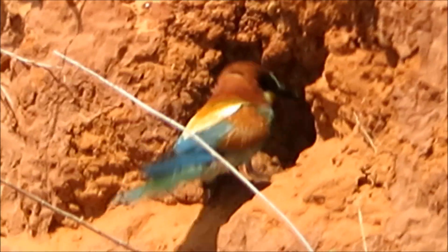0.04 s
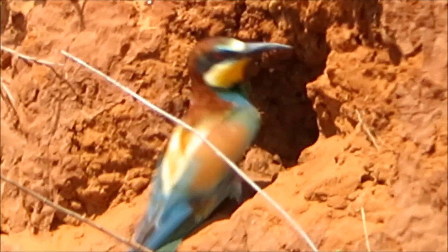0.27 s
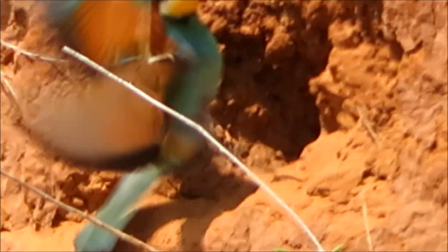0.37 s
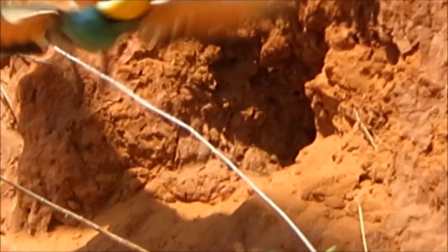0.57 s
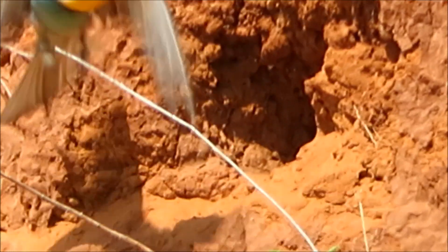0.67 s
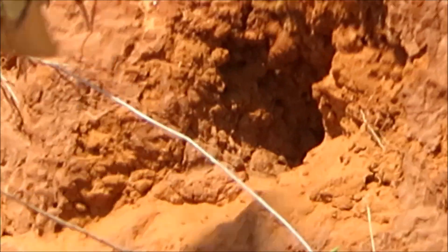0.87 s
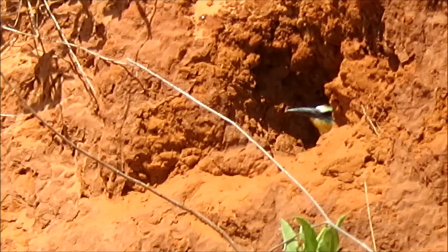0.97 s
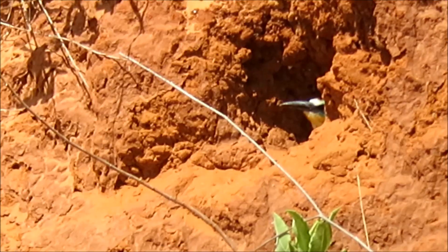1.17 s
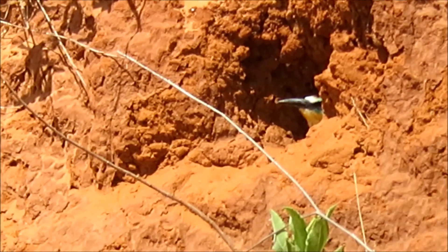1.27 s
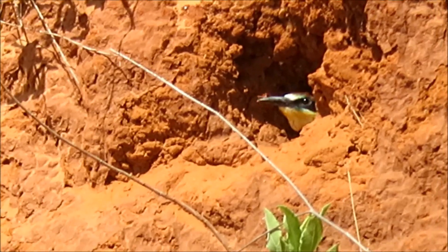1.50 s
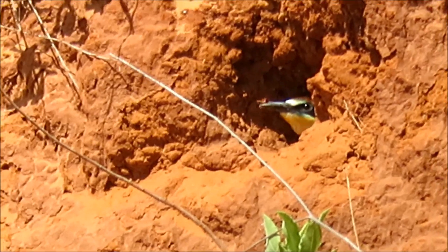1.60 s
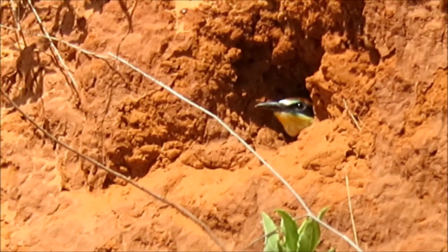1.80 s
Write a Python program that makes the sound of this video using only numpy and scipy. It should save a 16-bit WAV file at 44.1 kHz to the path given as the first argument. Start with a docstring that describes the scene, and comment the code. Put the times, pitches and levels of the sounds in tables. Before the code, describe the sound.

Wind rumbles and thumps against the microphone outdoors, strongest in the middle. A bee-eater at an earth bank gives one short rolling whistle, then three quick ones near the end, while small birds chirp very faintly far off.

```python
"""Bee-eater at a windy earth bank

Out in the open, facing the bank, gusts throw eddies against the camera microphone over a soft hush.
A bee-eater gives four whistles, rolled by quick upward flips of pitch, and the bank echoes them.
Small birds chirp and churr faintly far off, the chirps to the right. A dry rustle and one tick
come before the first whistle."""
import sys
import numpy as np
from scipy import signal
from scipy.fft import rfft, irfft
from scipy.io import wavfile
from scipy.ndimage import uniform_filter1d

SR = 44100
rng = np.random.default_rng(int(sys.argv[2]) if len(sys.argv) > 2 else 0)


def materialize(psi):
    """Save the field psi as 16-bit PCM at rate SR to the path in sys.argv[1].

    A 1-D psi becomes a single channel; in a 2-D psi each row is a channel.
    """
    bounded = np.clip(np.atleast_2d(psi).T, -1, 1)
    quanta = np.round(bounded * 32767).astype(np.int16)
    wavfile.write(sys.argv[1], SR, quanta)


N = 81585

# wind strength at the microphone: (time [s], relative level [dB])
GUSTS = [(0, -38), (.12, -39), (.195, -40), (.23, -33), (.3, -40.5), (.35, -37), (.38, -41.5), (.41, -32.5),
         (.46, -37.5), (.61, -36.5), (.66, -32), (.745, -22), (.78, -25), (.82, -27.5), (.85, -34),
         (.9, -25), (.95, -24), (1.0, -28.5), (1.04, -22.5), (1.075, -20.5), (1.1, -29), (1.14, -24.5),
         (1.152, -35), (1.21, -32.5), (1.25, -29), (1.29, -34), (1.34, -27.5), (1.37, -37.5),
         (1.392, -32.5), (1.405, -51), (1.46, -39), (1.53, -37.5), (1.57, -39.5), (1.62, -37.5),
         (1.72, -46.5), (1.78, -54), (1.85, -43)]
# hardest eddies: (time [s], relative peak [dB], pitch [Hz], bright snap against that peak [dB])
BUFFETS = [(0.016, -30.5, 276, -20), (0.063, -26.5, 333, -32), (0.23, -19.5, 243, -22),
           (0.408, -22, 213, -19.5), (0.431, -24.5, 208, -16), (0.518, -20, 223, -31),
           (0.629, -17.5, 348, -29), (0.735, -18, 197, -22), (0.749, -7, 263, -27.5),
           (0.805, -18.5, 249, -18.5), (0.819, -19, 254, -25.5), (0.876, -16.5, 304, -33),
           (0.911, -22.5, 340, -10), (0.934, -15.5, 465, -26.5), (0.962, -19, 324, -12.5),
           (1.059, -9.5, 446, -23.5), (1.067, -14.5, 227, -23), (1.077, -13.5, 290, -14),
           (1.127, -8.5, 174, -43), (1.143, -16, 271, -28), (1.188, -16.5, 233, -20.5),
           (1.235, -12, 166, -28), (1.268, -15.5, 238, -41), (1.305, -14, 210, -30), (1.379, -17, 193, -38),
           (1.392, -17.5, 203, -44), (1.509, -22, 282, -44)]
# colour of calm wind, strong wind and the roar atop a gust: (frequency [Hz], relative level [dB])
CALM_COLOUR = [(20, -21), (40, -2.5), (85, 0), (190, 7.5), (400, -2.5), (480, -7.5), (580, -15), (900, -54),
               (1600, -65.5), (6000, -110)]
STRONG_COLOUR = [(20, -27.5), (70, -3), (133, 0.5), (330, 4), (450, 0), (580, -9), (770, -19.5), (950, -34),
                 (1600, -44.5), (3500, -53), (12000, -100)]
ROAR_COLOUR = [(400, -27.5), (700, 6.5), (1200, -6), (2200, -52.5), (6000, -89.5)]
# wind that differs between the microphone's two ports: (frequency [Hz], side against mid [dB])
WIND_SIDE = [(25, -58.5), (60, -47.5), (125, -65), (250, -38), (450, -21), (800, -19), (1500, 6), (3000, 3)]
# colour of the open-air hush: (frequency [Hz], level per third octave before the swell [dB])
HUSH_COLOUR = [(25, -73), (50, -66), (100, -61.5), (300, -55), (600, -65.5), (1000, -61), (1400, -63),
               (1700, -65.5), (2100, -69), (2800, -72), (3700, -71), (5000, -75.5), (6300, -78),
               (8000, -81.5), (10000, -84), (12500, -89), (14000, -90.5), (15500, -110)]
# side level of the hush in the stereo mix, near mono below 2 kHz:
# (frequency [Hz], side against mid [dB])
HUSH_SIDE = [(500, -74.5), (1200, -63), (2000, -17), (3000, -8), (6000, -0.5), (12000, 4)]
# swell of the hush: (time [s], gain [dB])
HUSH_SWELL = [(0, -0.5), (.2, 0), (.4, 3), (.8, 2.4), (1.3, 3.5), (1.6, 2.5), (1.7, 5.5), (1.85, 2.5)]
# far chirps: (centre time [s], half length [s], pitch [Hz], glide per half [Hz], relative level [dB],
# left against right [dB])
CHIRPS = [(.065, .014, 5410, -40, -64, -9), (.14, .014, 4450, 0, -68, -4), (.169, .013, 6140, 15, -62, -7),
          (.406, .017, 5420, -80, -61, -5), (.493, .009, 4400, 0, -67, -3), (.516, .013, 6040, 40, -60, -4),
          (1.711, .016, 5930, 40, -69, -8)]
# course of the rustle: (time [s], level [dB])
RUSTLE_LEVEL = [(.17, -85), (.23, -58.5), (.33, -63.5), (.44, -56), (.49, -63), (.56, -56), (.65, -66),
                (.75, -63), (.85, -87)]
# its colour: (frequency [Hz], relative level [dB])
RUSTLE_COLOUR = [(500, -32.5), (900, -13.5), (1300, 2.5), (1600, -8), (2600, -8), (3500, -33),
                 (6000, -24.5), (12000, -67)]
# far churrs: (start [s], length [s], first pitch [Hz], last pitch [Hz], level [dB])
CHURRS = [(0.2, 0.088, 3800, 3570, -65), (.355, 0.037, 5500, 5470, -67), (0.763, 0.078, 3810, 3730, -67),
          (1.643, 0.14, 3906, 3446, -62.5), (1.8, .06, 3700, 4000, -68.5)]
# bee-eater, one list per whistle: (time [s], pitch before flips [Hz], relative level [dB])
WHISTLES = [
    [(.8, 1470, -66), (.82, 1589, -52), (.834, 1746, -49), (.846, 1757, -45), (.865, 1813, -45.5),
     (.887, 1783, -40.5), (.903, 1846, -48), (.915, 1703, -48), (.925, 1830, -41), (.936, 1755, -40.5),
     (.944, 1840, -64.5)],
    [(1.532, 1500, -47), (1.538, 1600, -50), (1.543, 1787, -52), (1.552, 1813, -39), (1.571, 1890, -36.5),
     (1.58, 1973, -39), (1.587, 1957, -37), (1.594, 1880, -75.5), (1.605, 1956, -46), (1.617, 2160, -52)],
    [(1.62, 1426, -45), (1.626, 1610, -48.5), (1.633, 1826, -48), (1.644, 1764, -38.5), (1.654, 1964, -36),
     (1.658, 1897, -43.5), (1.664, 1860, -38), (1.672, 1930, -53), (1.686, 1940, -45), (1.694, 1930, -62)],
    [(1.783, 1960, -63), (1.794, 1965, -49), (1.812, 2100, -40), (1.822, 2074, -47), (1.832, 1987, -39.5),
     (1.839, 2010, -54.5), (1.86, 2060, -29)],
]
# upward pitch flips that give the roll: (time [s], height [Hz])
FLIPS = [(0.852, 517), (0.876, 399), (0.894, 285), (0.926, 316), (1.585, 173), (1.822, 420), (1.85, 506)]
# reflections off the bank: (delay [s], left gain [dB], right gain [dB])
BANK_ECHOES = [(.006, -17, -19), (.013, -19, -16), (.026, -19, -20)]


def gain_of(db):
    """Decibels to gain."""
    return 10 ** (np.asarray(db) / 20)


def unit_rms(x):
    """Scales to rms 1."""
    return x / np.sqrt(np.mean(x ** 2) + 1e-20)


def curve(points, col=1):
    """A table column along the whole time axis."""
    rows = np.array(points)
    return np.interp(np.arange(N) / SR, rows[:, 0], rows[:, col])


def coloured(x, *spectra):
    """Filters x by the sum of dB spectra."""
    log_hz = np.log(np.fft.rfftfreq(N, 1 / SR) + 1)
    db = sum(np.interp(log_hz, np.log(rows[:, 0]), rows[:, 1]) for rows in map(np.array, spectra))
    return irfft(rfft(x) * gain_of(db), N)


def flutter(samples):
    """Noise smoothed over so many samples, at rms 1."""
    return unit_rms(uniform_filter1d(rng.standard_normal(N), samples))


def stereo(mid, side):
    """Mid and side to left and right."""
    return np.array([mid + side, mid - side])


def wind(eddies_per_s=800, clump_s=.008, calm_db=-39, strong_db=-23.5):
    """Random eddies strike the microphone in clumps, brighter as the wind rises."""
    gust_db = curve(GUSTS)
    span = round(clump_s * SR)
    clump_db = 1.5 * unit_rms(uniform_filter1d(flutter(span), span))
    size = gain_of(1.5 * np.minimum(rng.exponential(1, (2, N)), 3))
    eddies = size * rng.choice([-1., 1.], (2, N)) * (rng.random((2, N)) < eddies_per_s / SR)
    strength = np.clip((gust_db - calm_db) / (strong_db - calm_db), 0, 1)
    mid, side = 0, 0
    for share, colour in ((1 - strength, CALM_COLOUR), (strength, STRONG_COLOUR)):
        rumble = coloured(eddies[0], colour)
        weight = np.sqrt(share) / np.std(rumble)
        mid += weight * rumble
        side += weight * coloured(eddies[1], colour, WIND_SIDE)
    roar = gain_of(-24 + 1.2 * (gust_db - strong_db))  # flares only in the strongest wind
    mid += roar * unit_rms(coloured(eddies[0], ROAR_COLOUR))
    side += roar * gain_of(-4) * unit_rms(coloured(eddies[1], ROAR_COLOUR))
    return gain_of(gust_db + clump_db - 1) * stereo(mid, side)


def hush():
    """Smooth far hush."""
    third_octave_to_density = [(hz, -10 * np.log10(.2316 * hz / (SR / 2))) for hz in (1, SR)]
    mid = coloured(rng.standard_normal(N), HUSH_COLOUR, third_octave_to_density)
    side = coloured(rng.standard_normal(N), HUSH_COLOUR, HUSH_SIDE, third_octave_to_density)
    return gain_of(curve(HUSH_SWELL)) * stereo(mid, side)


def buffets(thump_sigma_s=.002, snap_sigma_s=.0012, snap_hz=848):
    """Single hard eddies hit both microphone ports, each a low thump with a bright snap."""
    t, hits = np.arange(N) / SR, np.zeros((2, N))
    for at, db, hz, snap_db in BUFFETS:
        phases = rng.uniform(0, 2 * np.pi, (2, 1))  # mid, side
        thump = gain_of(db - 1.47) * np.exp(-((t - at) / thump_sigma_s) ** 2 / 2)
        snap = gain_of(db + snap_db) * np.exp(-((t - at) / snap_sigma_s) ** 2 / 2)
        hits += thump * np.cos(2 * np.pi * hz * (t - at) + phases)
        hits += snap * np.cos(2 * np.pi * snap_hz * t + phases[0])
    return stereo(hits[0], coloured(hits[1], WIND_SIDE))


def chirps(waver_hz=45):
    """Small birds far to the right give short, thin, wavering tones."""
    t, out = np.arange(N) / SR, np.zeros((2, N))
    waver = waver_hz * flutter(130)
    for centre, half_length, hz, glide_hz, db, pan_db in CHIRPS:
        position = np.clip((t - centre) / half_length, -1, 1)
        phase = 2 * np.pi * np.cumsum(hz + glide_hz * position + waver) / SR
        tone = np.sin([phase, phase + rng.uniform(1, 2.3)])  # out of step between the channels
        pan = gain_of([[pan_db / 2], [-pan_db / 2]])
        out += gain_of(db + 6.5) * pan * np.cos(np.pi / 2 * position) ** 2 * tone
    return out


def rustle(grains_per_s=4000, side_db=-21.5):
    """Dense dry grains near the centre, perhaps feathers as a bird turns and takes off."""
    size = gain_of(1.5 * rng.exponential(1, (2, N))) * rng.standard_normal((2, N))
    grains = size * (rng.random((2, N)) < grains_per_s / SR)
    mid, side = (unit_rms(coloured(row, RUSTLE_COLOUR)) for row in grains)
    return gain_of(curve(RUSTLE_LEVEL)) * stereo(mid, gain_of(side_db) * side)


def churrs(width_hz=260, pulses_per_s=110, side_db=-11):
    """Small birds further off churr: a narrow band of noise that glides and pulses."""
    t, out = np.arange(N) / SR, np.zeros((2, N))
    lowpass = signal.butter(2, width_hz / 2, fs=SR)
    pulsing = 1 + .15 * np.sin(2 * np.pi * pulses_per_s * t)
    for start, length, first_hz, last_hz, db in CHURRS:
        pitch = np.interp(t, [start, start + length], [first_hz, last_hz])
        phase = 2 * np.pi * np.cumsum(pitch) / SR
        slow_noise = signal.lfilter(*lowpass, rng.standard_normal((2, 2, N)))
        mid, side = unit_rms(slow_noise[0] * np.cos(phase) + slow_noise[1] * np.sin(phase))
        progress = np.clip((t - start) / length, 0, 1)
        arch = np.sqrt(np.sin(np.pi * progress).clip(0))
        out += gain_of(db) * arch * pulsing * stereo(mid, gain_of(side_db) * side)
    return out


def tick(at_s=.7357, decay_s=.00008, side_db=-4):
    """One small sharp pulse to the left of the microphone."""
    age = np.clip(np.arange(N) / SR - at_s, 0, .01) / decay_s
    pulse = gain_of(-29) * age ** 2 * (1 - age / 3) * np.exp(-age)
    return stereo(pulse, gain_of(side_db) * pulse)


def bee_eater(rise_s=.00209, fall_s=.0045, ramp_s=.003, flip_db_per_khz=3.5, overtone_db=-37):
    """Slightly rough, near-sine whistles slide up and roll, louder at each flip of pitch."""
    t, voice = np.arange(N) / SR, np.zeros(N)
    flip_hz = sum(hz * np.exp(-((t - at) / np.where(t < at, rise_s, fall_s)) ** 2 / 2)
                  for at, hz in FLIPS)
    for whistle in WHISTLES:
        start, end = whistle[0][0], whistle[-1][0] + ramp_s
        gate = np.clip(np.minimum(t - start, end - t) / ramp_s, 0, 1)
        phase = 2 * np.pi * np.cumsum(curve(whistle) + flip_hz) / SR
        level = gain_of(curve(whistle, col=2) + 3 + flip_db_per_khz * flip_hz / 1000)
        voice += gate * level * (np.sin(phase) + gain_of(overtone_db) * np.sin(2 * phase))
    return voice * (1 + .22 * flutter(90))


def earth_bank(voice, pan_db=.5):
    """A call reaches the microphone from almost straight ahead, then three times off the bank."""
    out = voice * gain_of([[pan_db / 2], [-pan_db / 2]])
    for delay, left_db, right_db in BANK_ECHOES:
        lag = round(delay * SR)
        out[:, lag:] += gain_of([[left_db], [right_db]]) * voice[:N - lag]
    return out


def scene():
    """Everything that reaches the microphone in front of the bank."""
    air = wind() + buffets() + hush()
    return air + rustle() + tick() + earth_bank(bee_eater()) + chirps() + churrs()


def record(dry, low_cut_hz=50, top_hz=15600, fade_s=.001):
    """The microphone's bass roll-off and the recorder's band limit, with soft ends."""
    thinned = signal.lfilter(*signal.butter(2, low_cut_hz, "highpass", fs=SR), dry)
    t = np.arange(N) / SR
    fades = np.clip(np.minimum(t, t[::-1]) / fade_s, 0, 1)
    band_limit = signal.firwin(511, top_hz, window=("kaiser", 9), fs=SR)
    return signal.oaconvolve(thinned * fades, band_limit[None], "same")


dry = scene()
out = record(dry)
materialize(out)
```